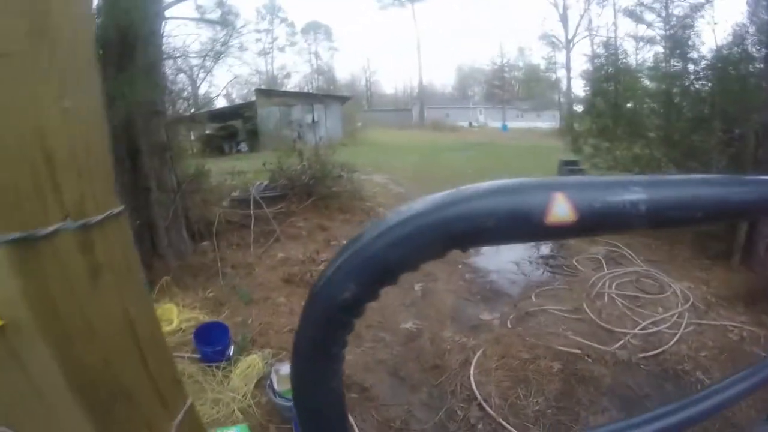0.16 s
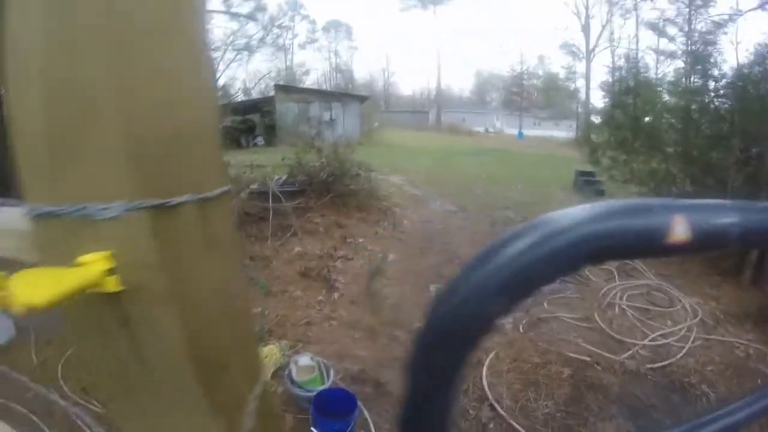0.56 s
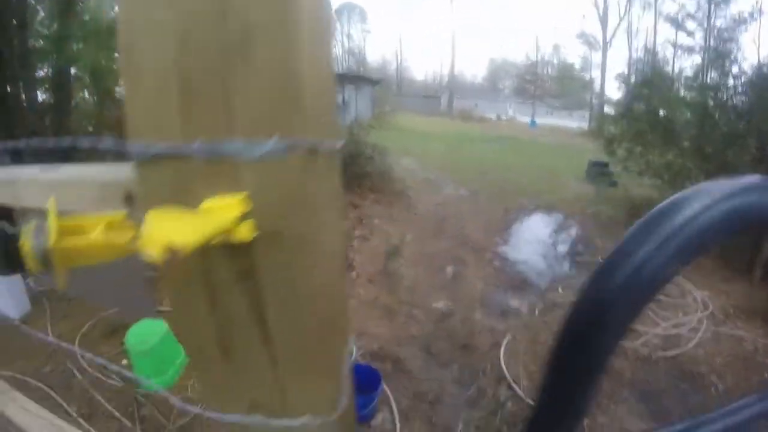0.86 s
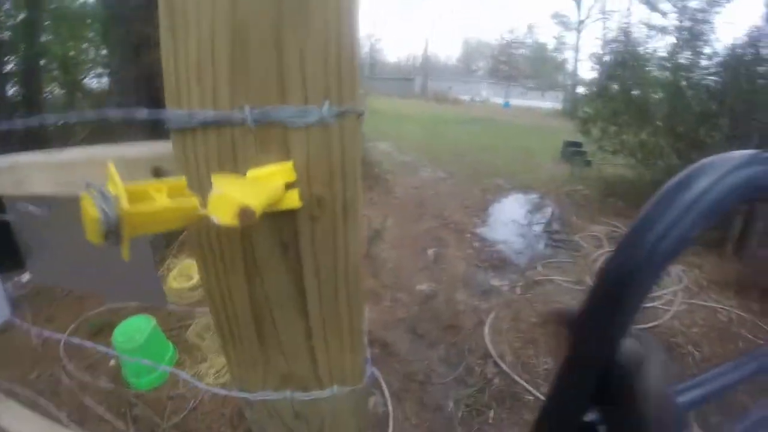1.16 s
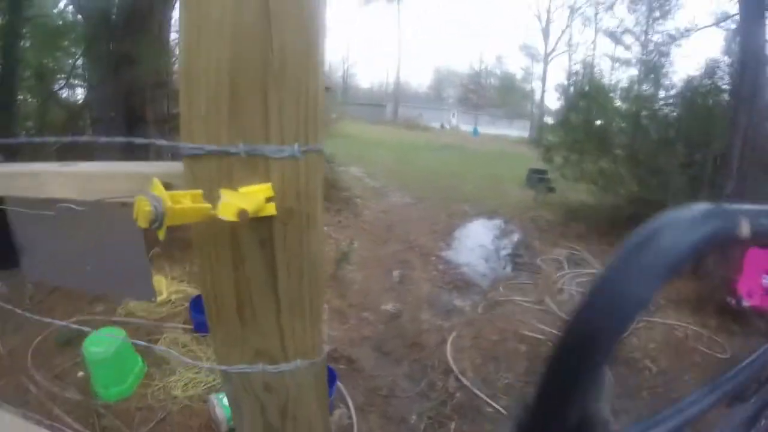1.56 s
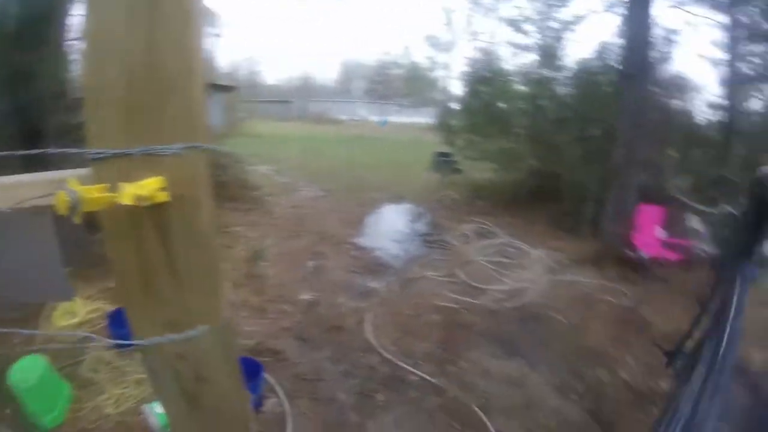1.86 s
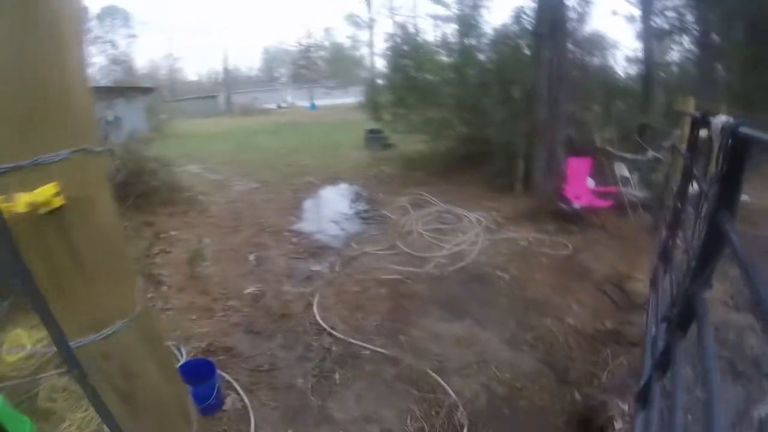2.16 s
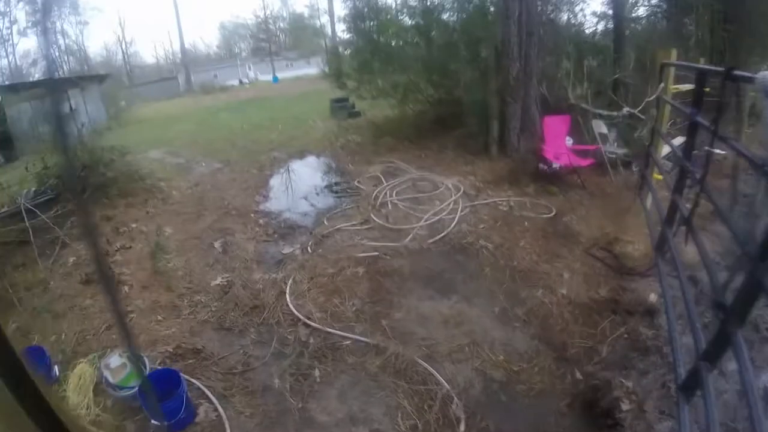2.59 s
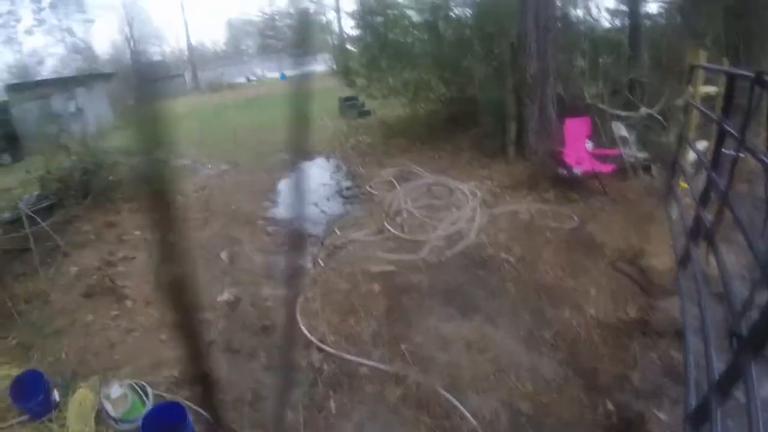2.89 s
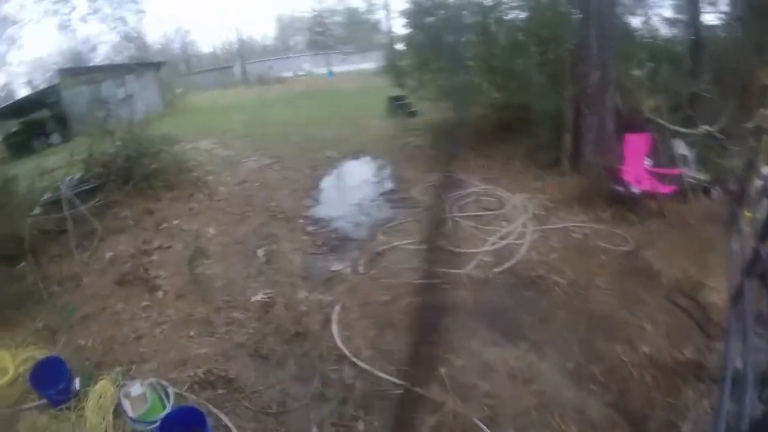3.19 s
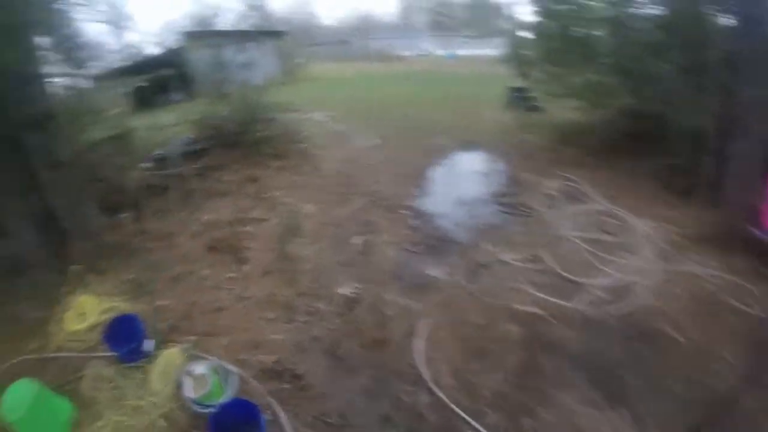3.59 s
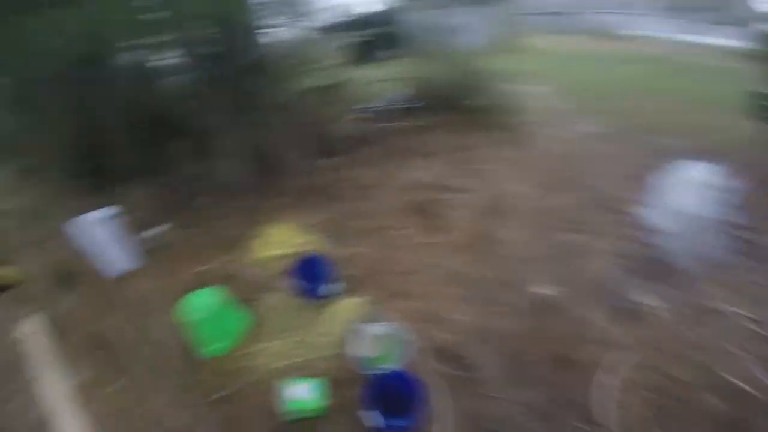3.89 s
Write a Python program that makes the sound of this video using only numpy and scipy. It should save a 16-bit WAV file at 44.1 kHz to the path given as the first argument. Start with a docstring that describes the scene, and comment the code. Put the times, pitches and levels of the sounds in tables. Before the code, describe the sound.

Close by in a quiet outdoor yard, a hollow metal gate shakes and rings under several fast blows. Short, muted latch knocks follow, mixed with the high jingle of a small chain. After a quieter stretch of rustling and light ticking as it swings, the gate hits a fence panel with a bouncing clang that rings out. A faint, steady low rumble lies underneath.

```python
"""A steel tube gate in a quiet yard, over a steady low rumble. First the gate is jolted free: each blow
sets its bars and thin tube walls ringing, and a light chain starts to jingle. Then the latch knocks,
short and dull because a hand is holding the tube. The hand lets go and the gate swings open with a
rustle and a few faint ticks. Finally it clangs against a fence panel, bounces, and both ring out."""
import sys
import numpy as np
from scipy import signal
from scipy.fft import rfft, irfft, next_fast_len
from scipy.io import wavfile

SR = 44100
rng = np.random.default_rng(int(sys.argv[2]) if len(sys.argv) > 2 else 0)


def dump(signal):
    """Clip the signal to [-1, 1] and save it as 16-bit WAV at the path in sys.argv[1]."""
    limited = np.clip(np.atleast_2d(signal).T, -1, 1)
    pcm = np.round(limited * 32767).astype(np.int16)
    wavfile.write(sys.argv[1], SR, pcm)


N = 178428

# tube tones heard in both the jolts and the clang: f/Hz, level/dB, t60/s (the time to fade by 60 dB)
TUBE_TONES = [(670, -3.5, 0.2), (1022, -18.5, 0.85), (1079, -16, 1), (2832, -23.5, 0.99),
              (2830, -18.5, 0.97), (5160, -20, .4)]


def from_db(db):
    """Turn decibels into a factor to multiply by."""
    return 10 ** (np.asarray(db) / 20)


def at_hz(points, hz):
    """Look up a frequency in (frequency, value) rows, sliding smoothly between them."""
    return colour_db(hz, *np.transpose(points))


def colour_db(hz, points_hz, points_db):
    """Read a curve through the given points, with every octave equally wide."""
    return np.interp(np.log(hz), np.log(points_hz), points_db)


def add(out, s, sound):
    """Mix a sound in, starting at s seconds."""
    i = max(round(s * SR), 0)
    out[i:i + len(sound)] += sound[:len(out) - i]


def signs(count):
    """Pick at random whether each tone starts upwards or downwards."""
    return rng.choice([-1, 1], count)


def rings(hz, t60, seconds):
    """Struck metal rings in fading sine tones: one row for each tone."""
    t = np.arange(int(seconds * SR), dtype=np.float32) / SR
    hz, t60 = np.float32(hz)[:, None], np.float32(np.maximum(t60, .004))[:, None]
    return np.sin(2 * np.pi * hz * t) * np.exp(-np.log(1000) * t / t60)


def noise(spectrum, flicker_db):
    """Noise with the given mix of low and high; its level flickers around an average (rms) of 1."""
    size = next_fast_len(N)
    hz = np.maximum(np.arange(size // 2 + 1) * SR / size, 1)
    inside = (hz > spectrum[0][0]) & (hz < spectrum[-1][0])
    white = rfft(rng.standard_normal(size))
    x = irfft(white * from_db(at_hz(spectrum, hz)) * inside, size)[:N]
    flicker = np.interp(np.arange(N) / 900, np.arange(N // 900 + 2), rng.standard_normal(N // 900 + 2))
    x *= from_db(flicker_db * flicker)
    return x / np.std(x)


def jolts():
    """A quick run of blows frees the gate and rings its tube walls and bars."""
    # the blows: t/s, level/dB, low bar tones/dB, treble/dB (the last two relative to the level)
    blows = [(0.0, -26, -14.5, -29), (0.0317, -24, -3.5, -23), (0.068, -6, -32.5, -8.5),
             (0.0968, -12.5, -45, -3), (0.1534, -9.5, -17.5, -8), (0.1894, -15.5, -3, -7.5),
             (0.2229, -0.5, -20, -7), (0.3003, -5.5, -31.5, -9), (0.404, -17.5, -19.5, -13.5),
             (0.4683, -19.5, -50, -7), (0.5444, -32, -6.5, -35), (0.624, -35, -43, -11)]
    # dense ring of the tube walls: f/Hz, level/dB
    wall_spectrum = [(150, -42), (250, -9.5), (335, -10.5), (466, -5.5), (603, -10.5), (837, -9.5),
                     (945, -17), (1560, -0.5), (2200, -2.5), (2530, -9), (3510, -0.5), (4630, -8),
                     (6650, -10), (15500, -39)]
    # higher clear tones of the gate: f/Hz, level/dB, t60/s
    gate_tones = [(1012, -11, 0.18), (1346, -13, 0.72), (1620, -3, 0.46), (1798, -6, 0.41), (1954, -7, 0.8),
                  (2030, 0, 0.22), (2121, -8, 0.38), (2369, -12, 0.42), (2422, -11, 0.47),
                  (2649, -12, 0.41), (2751, -9, 0.45), (2998, -5, 0.33), (3036, -15, 0.62),
                  (3112, -14, 0.64), (3278, -11, 0.46), (3429, -5, 0.25), (3677, -9, 0.49),
                  (3833, -17, 0.66), (3919, -16, 0.73), (4145, -24, 2.9), (4242, -13, 0.25),
                  (4398, -24, 2.5), (4867, -22, 0.83), (5297, -19, 0.5), (5663, -22, 0.54),
                  (7154, -17, 0.41)]
    shimmer = walls(blows, wall_spectrum, level_db=-3.52, usual_treble_db=-11.5, crack_db=3.5)
    return shimmer + bars(blows, list(gate_tones) + list(TUBE_TONES), low_db=-13, high_db=-21.5)


def walls(blows, spectrum, level_db, usual_treble_db, crack_db):
    """Tube walls have too many tones to tell apart: bands of noise jump at each blow, then fade."""
    # how long the walls ring: f/Hz, t60/s
    ring_times = [(300, 0.26), (1000, 0.84), (1700, 0.47), (2500, 0.39), (2900, 0.74), (3500, 0.42),
                  (4500, 0.31), (6500, 0.26), (9000, 0.15), (15000, 0.32)]
    size, edges_hz = 49152, np.geomspace(250, 15800, num=49)
    bins_hz = np.arange(size // 2 + 1) * SR / size
    hiss = rfft(rng.standard_normal(size))
    hiss *= np.where(rng.random(len(bins_hz)) < .03, 3.5, .8)   # a few tones stand out
    s, db, _, treble_db = np.transpose(blows)
    starts = np.int_((s - s[0]) * SR)
    out, ring = np.zeros(N), np.zeros(size)
    for low, high in zip(edges_hz, edges_hz[1:]):
        hz, energy = np.sqrt(low * high), np.full(size, 1e-18)
        tilt_db = (treble_db - usual_treble_db) * colour_db(hz, [3200, 6500], [0, 1])
        energy[starts] = from_db(2 * (db + at_hz(spectrum, hz) + tilt_db + rng.normal(0, 1.75, len(s))))
        # energy is the wave's size squared, so -120 here makes the sound fade by 60 dB
        tail = signal.lfilter([1], [1, -from_db(-120 / (at_hz(ring_times, hz) * SR))], energy)
        crack = signal.lfilter([from_db(crack_db)], [1, -from_db(-120 / (0.02 * SR))], energy)
        band = irfft(hiss * (bins_hz >= low) * (bins_hz < high), size)
        ring += np.sqrt(tail + crack) * band
    add(out, s[0], from_db(level_db) * ring)
    return out


def bars(blows, upper_tones, low_db, high_db):
    """Struck bars bend to and fro in clear tones; each blow shares its force among them differently."""
    # the four lowest bending tones: f/Hz
    low_hz = [407.6, 453.3, 520.6, 539.3]
    # for each of them: level/dB, t60/s, gap to its twin tone/Hz, time of the swell's peak/s
    low_tones = [(-9.5, 2, 1.1, 0.13), (-4, 1.36, 1.58, 0.28), (0.5, 3.9, 0.75, 0.088),
                 (-32.5, 0.61, .4, .01)]
    tones = [(f, *row[:2]) for f, row in zip(low_hz, low_tones)] + list(upper_tones)
    hz, tone_db, t60 = np.transpose(tones)
    longest_t60 = np.where(hz < 560, 5, 1.1)
    ring = rings(hz, np.minimum(t60, longest_t60), seconds=.9)
    out, t = np.zeros(N), np.arange(ring.shape[1]) / SR
    for k, (_, _, gap_hz, peak_s) in enumerate(low_tones):
        # a tube bends two ways, slightly out of tune, so the tone swells and sinks
        ring[k] *= np.cos(np.pi * gap_hz * (t - peak_s))
        ring[k] *= 1 - np.exp(-t / .003)   # builds up in about 3 ms
    ring[1::2] *= -1   # every other tone starts the opposite way, so their starts do not add up to one low thump
    for s, db, bar_db, _ in blows:
        share_db = colour_db(hz, [545, 560], [bar_db + low_db, high_db]) + rng.normal(0, 1, len(hz))
        add(out, s, np.float32(from_db(db + tone_db + share_db)) @ ring)
    return out


def chain():
    """Small links ring high and thin; each shake is a run of jingles, all tuned a little differently."""
    # tones of a link: f/Hz, level/dB, t60/s
    link_tones = [(11620, -0.5, 0.06), (11680, -4, 0.09), (11760, -6, 0.05), (13080, -15, 0.08),
                  (13160, -17, 0.05), (14230, -22, 0.05), (14320, -23, .05)]
    # shakes of the chain: t/s, length/s, level/dB
    shakes = [(0.0, .03, -51), (0.06, .05, -38), (0.16, .09, -45), (0.245, .08, -38), (0.3501, .028, -45),
              (0.469, .06, -40), (0.542, .028, -26), (0.598, .055, -52), (0.69, .13, -49.5),
              (0.864, .07, -37), (0.95, .055, -37.5), (1.177, .027, -47), (1.2042, .12, -24),
              (1.378, .09, -33), (1.583, .028, -49.5), (1.678, .028, -45), (1.754, .05, -43),
              (1.79, .028, -30), (2.212, .028, -39)]
    hz, tone_db, t60 = np.transpose(link_tones)
    out, gap_s, rise_s = np.zeros(N), .029, .0003
    for start, length, level_db in shakes:
        for k in range(6):
            ring = rings(hz * from_db(rng.normal(0, 0.023, len(hz))), t60, seconds=.2)
            ring *= 1 - np.exp(-np.arange(ring.shape[1]) / SR / rise_s)
            strength = from_db(tone_db + level_db - 6 + rng.normal(0, 2.6, len(hz))) * signs(len(hz))
            delay_s = gap_s * k * rng.uniform(0.65, 1.2)
            taps = touches(seconds=0.027, count=6)
            if k == 0 or gap_s * (k + .5) < length:
                add(out, start + delay_s, signal.fftconvolve(strength @ ring, taps))
    return out


def touches(seconds, count):
    """Links touch a few times in one jingle: uneven taps, crowded near the start."""
    taps = np.zeros(int(seconds * SR) + 2)
    taps[np.int_(rng.random(count) ** 2 * (len(taps) - 1))] = rng.standard_normal(count)
    return taps / np.sqrt(np.sum(taps ** 2))


def yard():
    """Steady outdoor rumble with a faint hiss."""
    # the yard's noise from low to high: f/Hz, level/dB
    spectrum = [(12, -12), (20, -6.5), (84, 3), (124, -5), (160, -3), (199, -9), (445, -27.5), (603, -17),
                (656, -20), (1210, -24), (1830, -22), (2340, -79.5), (6360, -38.5), (15000, -56)]
    return from_db(-47) * noise(spectrum, flicker_db=1.1)


def rustle():
    """A dull noise and a bright one swell and sink as the gate moves."""
    # loudness over time: t/s, dull level/dB, bright level/dB
    swells = [(0.7, -56, -65), (0.97, -57.5, -53), (1.11, -46, -55.5), (1.45, -48.5, -54), (1.58, -52, -63),
              (1.92, -45, -53), (2.12, -43, -52.5), (2.37, -54.5, -62.5), (2.56, -58, -62.5),
              (3.02, -60.5, -64), (3.3, -47.5, -63), (3.851, -53.5, -64), (4.046, -53, -58)]
    # the dull part: f/Hz, level/dB
    dull_spectrum = [(120, -28), (200, -6), (276, 3.5), (512, 3.5), (965, -7), (1300, -12), (1690, -9.5),
                     (2860, -120)]
    # the bright part: f/Hz, level/dB
    bright_spectrum = [(650, -19), (1100, -7), (1230, -30), (1720, 5.5), (1980, 10), (2850, 2.5),
                       (4870, -3), (8960, -18.5), (11600, -20.5), (13000, -19.5)]
    s, dull_db, bright_db = np.transpose(swells)
    t = np.arange(N) / SR
    dull = from_db(np.interp(t, s, dull_db)) * noise(dull_spectrum, flicker_db=3.5)
    bright = from_db(np.interp(t, s, bright_db)) * noise(bright_spectrum, flicker_db=0.8)
    return dull + bright


def latch():
    """Each knock is a noisy crack, a few short tones and a faint longer ring of the hand-held tube."""
    # the knocks: t/s, level/dB, relative thud/dB, relative treble/dB, crack pitch/Hz, ring time factor
    knocks = [(0.7507, -34, -16, -14, 3180, 4.2), (0.7836, -25.5, -21.5, -18, 3000, 0.95),
              (0.8894, -44.5, 2, 12, 1450, 1.6), (0.9049, -46, -12, 16, 1310, 2.2),
              (0.9194, -36, -9, 9, 1500, 0.87), (0.9278, 6, -18, -8, 1840, 0.51),
              (0.9344, -6, -10.5, -13, 1580, 1), (0.9557, -11, -11.5, -10, 1520, 2.2),
              (0.9872, -12, 1.5, -4.5, 1095, 1.75), (0.9944, -19.5, 7.5, -14, 1590, 3.2),
              (1.0074, -23, -25, -5, 1180, 0.81), (1.0246, -13, -4, -4.5, 3380, 0.72),
              (1.1947, -8.5, -12, -28, 1528, 1.6), (1.2451, -19.5, -14, -45, 1750, 0.78),
              (1.2715, -26, -18, -37, 1760, 1.1), (1.2935, -14, -15.5, -15, 1977, 1.16),
              (1.3798, -14.5, -5, -3, 1455, 2.36), (1.4144, -21.5, 7.5, -29, 2000, 0.38),
              (1.4376, -5.5, -13, -8.5, 1436, 0.85), (1.4564, -17, -29, -9, 1570, 1.44),
              (1.4694, -22.5, -2.5, 1.5, 1446, 0.99), (1.4994, -34, 5, -7, 1210, 3.8),
              (1.5414, -34.5, 7.5, 0.5, 1800, 2.3), (1.735, -26.5, -1.5, -11, 1453, 1.9),
              (1.7699, -20, -3, -10.5, 1700, 0.93), (1.7894, -28, -3.5, -23, 1430, 2),
              (1.8064, -34.5, 2, 6.5, 1520, 1.05), (2.0158, -33.5, -12, -24, 2150, 1.4),
              (2.2154, -38, 5, -15, 1430, 1.5), (2.2443, -22.5, -11, -36, 1844, 1.05),
              (2.2644, -33, -22, -17, 1825, 1.6), (2.3815, -41.5, 17, -30, 1380, 1.16),
              (2.7432, -30, -5.5, -34, 1797, 1.1), (3.1699, -39, 7.5, -43, 1288, 0.86),
              (3.228, -44.5, 8, -20, 1720, 2.2), (3.258, -36.5, 13.5, -50, 1365, 1.55)]
    # tones of the latch: f/Hz, level/dB, t60/s
    latch_tones = [(459.6, -14.5, 0.06), (617, -9.5, 0.07), (749, -2.5, 0.02), (1060, -11, 0.075),
                   (1457, -7, 0.11), (1842, -4.5, 0.056), (2134, -4, 0.026), (2910, -4, 0.034)]
    # what still rings under the hand: f/Hz, level/dB, t60/s
    held_tones = [(459, -5.5, 0.19), (609, -11, 0.09), (682, -17, 0.6), (731, -1, 0.24), (766.3, -4, 0.35),
                  (816, -1.5, 0.18), (1108, -11, 0.23), (1410, -25.5, 0.6)]
    latch_hz, latch_db, latch_t60 = np.transpose(latch_tones)
    held_hz, held_db, held_t60 = np.transpose(held_tones)
    out, size, let_go_s = np.zeros(N), 4096, 1.9
    t = np.arange(size) / SR
    rise = 1 - np.exp(-(t / 0.00018) ** 2)   # contact takes a moment to build
    tube = rings(held_hz, held_t60, seconds=.4)
    tube[:, :size] *= rise
    for s, level_db, thud_db, treble_db, centre_hz, stretch in list(knocks) + ticks():
        hz = latch_hz * from_db(rng.normal(0, 0.093, len(latch_hz)))   # the grip shifts between knocks
        tone_db = latch_db - 11 + colour_db(hz, [900, 1300], [thud_db + 7.5, -3])
        tone_db += rng.normal(0, 2.5, len(hz))
        body = (from_db(tone_db) * signs(len(hz))) @ rings(hz, latch_t60 * stretch, seconds=.1)
        struck_spot = rings([centre_hz], [.05 * stretch], seconds=0.079)[0]
        add(body, 0, from_db(-13) * struck_spot)
        body[:size] *= rise
        fade = np.exp(-t / (.003 * stretch)) + 0.21 * np.exp(-t / (.014 * stretch))
        crack = crack_noise(size, thud_db, treble_db, centre_hz) * fade * rise
        held_mix = from_db(held_db + rng.normal(0, 2.3, len(held_db))) * signs(len(held_db))
        tube_db = thud_db - 15 - 24 * (s > let_go_s)   # much fainter once the hand has let go
        add(out, s, from_db(level_db) * body)
        add(out, s, from_db(level_db - 2.5) * crack)
        add(out, s, from_db(level_db + tube_db) * held_mix @ tube)
    return signal.sosfilt(signal.butter(2, 250, "high", fs=SR, output="sos"), out)


def crack_noise(size, thud_db, treble_db, centre_hz):
    """The noise in one knock: a low thud, some treble and a peak at the crack's pitch."""
    hz = np.arange(1, size // 2 + 2) * SR / size
    shape = [(150, thud_db - 11), (350, thud_db + 7.5), (900, thud_db - 9), (1300, 0),
             (4500, 0.43 * treble_db), (6000, treble_db - 0.5), (8500, treble_db - 8.5),
             (10000, treble_db - 9.5), (16000, treble_db - 28.5)]
    peak_db = 8 / (1 + (np.log(hz / centre_hz) / 0.081) ** 2)
    return irfft(rfft(rng.standard_normal(size)) * from_db(at_hz(shape, hz) + peak_db))


def ticks():
    """The loose latch also ticks faintly at random: rows with the same columns as the knocks."""
    return [(rng.uniform(0.72, 2.95), rng.uniform(-57, -49), rng.uniform(-13, 1), rng.uniform(-5, 11),
             1600 * from_db(rng.uniform(-2.85, 2.85)), 1.3) for _ in range(16)]


def nudges():
    """Soft pushes on the gate wake only the low tones of its bars."""
    # the pushes: t/s, level/dB
    pushes = [(2.096, -47.5), (3.322, -41)]
    return bars([(s, db, 0, 0) for s, db in pushes], upper_tones=[], low_db=0, high_db=0)


def clang():
    """The gate hits the fence panel and bounces, so both ring together."""
    # the hits: t/s, level/dB, relative low bar tones/dB, relative treble/dB
    hits = [(3.3497, -11, -26, -11.5), (3.3682, -9, -6.5, -1.5), (3.3767, -1, -7.5, -29),
            (3.3904, -10.5, -11.5, -30.5), (3.4064, -18.5, -11, -9.5)]
    # dense ring of gate and panel together: f/Hz, level/dB
    panel_spectrum = [(150, -63), (250, -32), (507, -4.5), (669, -27), (755, -25), (823, -14), (1290, -15),
                      (1560, -4), (2160, -0.5), (2440, -21.5), (3010, -9), (4030, -11.5), (6420, -12.5),
                      (11000, -28.5), (15500, -46)]
    # clear tones of the panel: f/Hz, level/dB, t60/s
    panel_tones = [(608, -9, 1.2), (834, -13, 0.72), (904, -12, 2.1), (1050, -7, 1.9), (1195, -10, 0.81),
                   (1233, -17, 1.5), (1287, -9, 0.47), (1384, -8, 0.56), (1470, -3, 0.81),
                   (1540, -10, 0.92), (1572, -6, 0.52), (1663, -9, 0.54), (1750, 0, 0.37), (1820, -7, 0.63),
                   (1992, -13, 0.6), (2073, -2, 0.35), (2191, -8, 0.56), (2482, -25, 0.91),
                   (2643, -21, 0.43), (2923, -5, 0.45), (3155, -5, 0.5), (3214, -13, 0.69),
                   (3343, -10, 0.38), (3575, -18, 0.5), (3709, -21, 0.73), (4118, -24, 0.42),
                   (5620, -25, 0.36), (6223, -24, 0.29)]
    shimmer = walls(hits, panel_spectrum, level_db=-0.5, usual_treble_db=-7, crack_db=5.0)
    return shimmer + bars(hits, list(panel_tones) + list(TUBE_TONES), low_db=-10.5, high_db=-23.5)


def scene():
    """Gate, latch and chain over the rustle and the yard noise, in one channel."""
    background = rustle() + yard()
    bass_cut = signal.butter(4, 220, "high", fs=SR, output="sos")   # thin tubes give off no bass
    gate = signal.sosfilt(bass_cut, jolts() + clang() + nudges())
    return (gate + latch() + chain() + background)[None]


def record(dry):
    """Round off the loudest peaks, then cut away the very highest treble."""
    ceiling, cutoff_hz = .97, 16300
    rounded = dry / (1 + (dry / ceiling) ** 4) ** .25
    return signal.sosfilt(signal.cheby2(12, 80, cutoff_hz, fs=SR, output="sos"), rounded)


dry = scene()
out = record(dry)
dump(out)
```